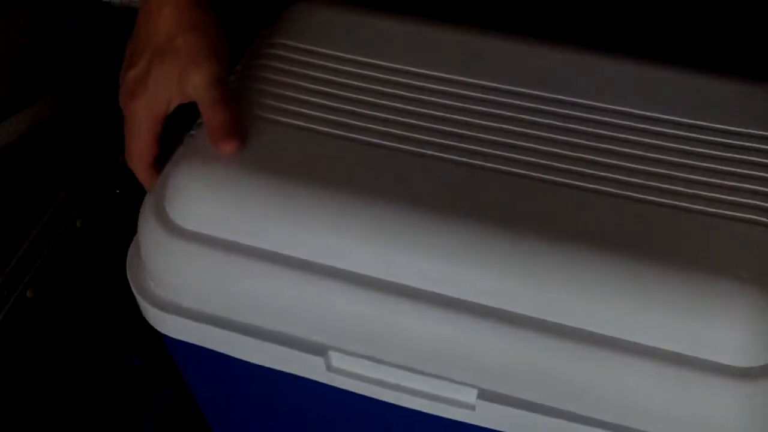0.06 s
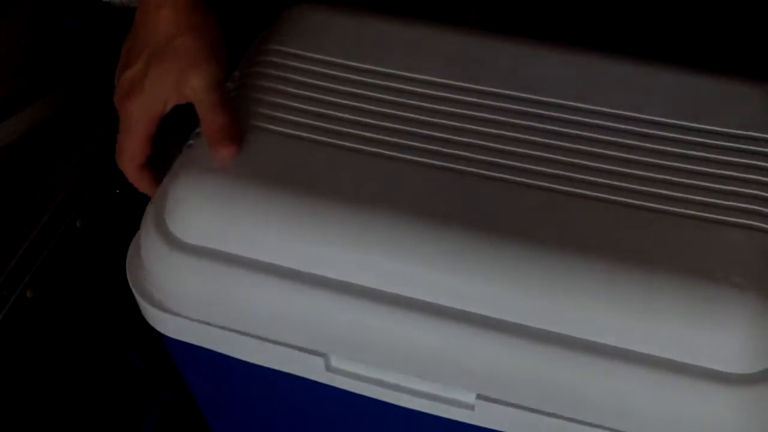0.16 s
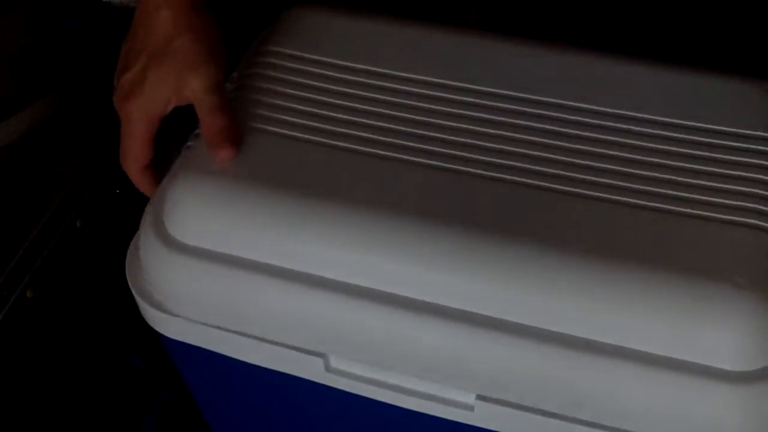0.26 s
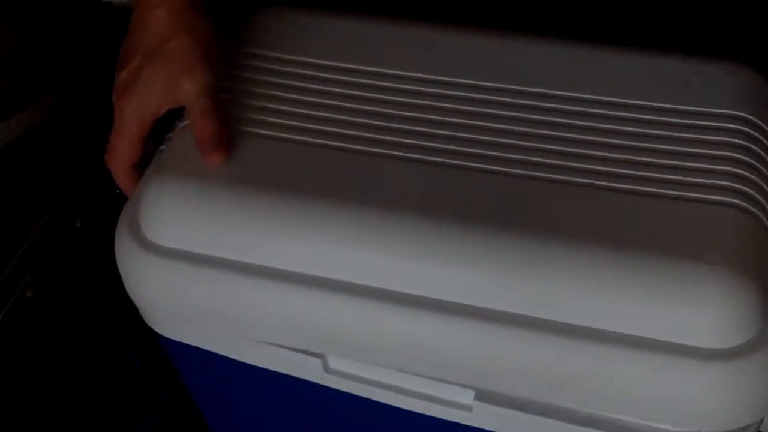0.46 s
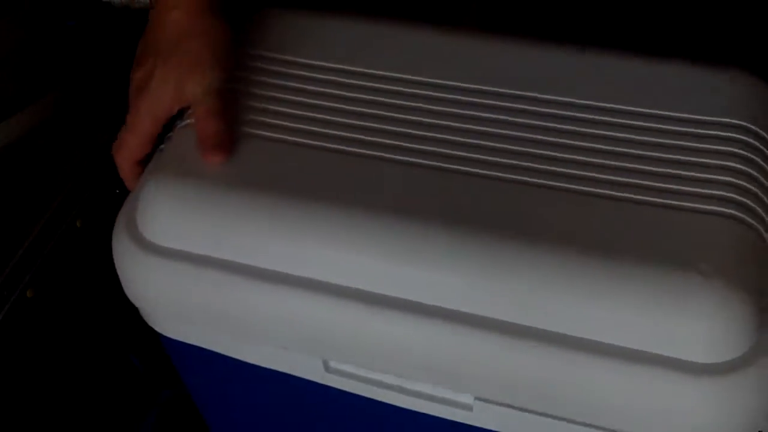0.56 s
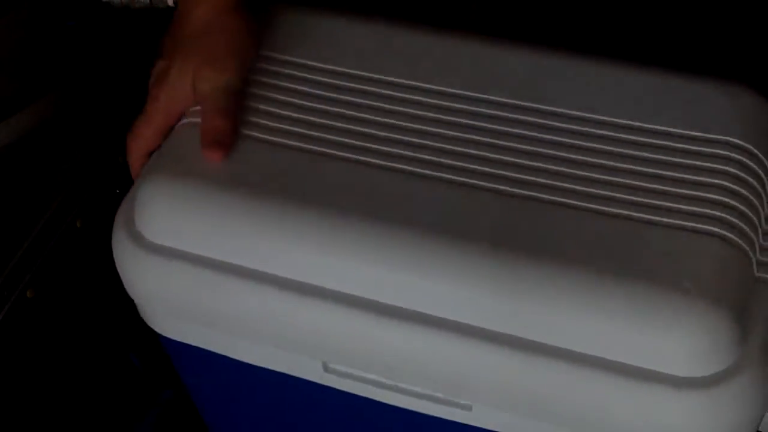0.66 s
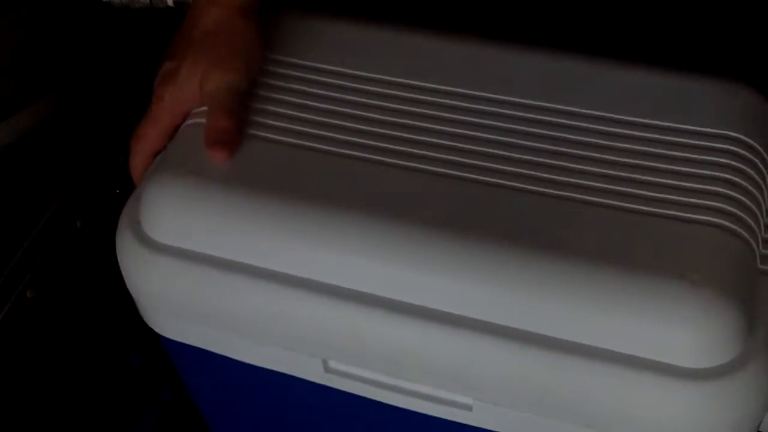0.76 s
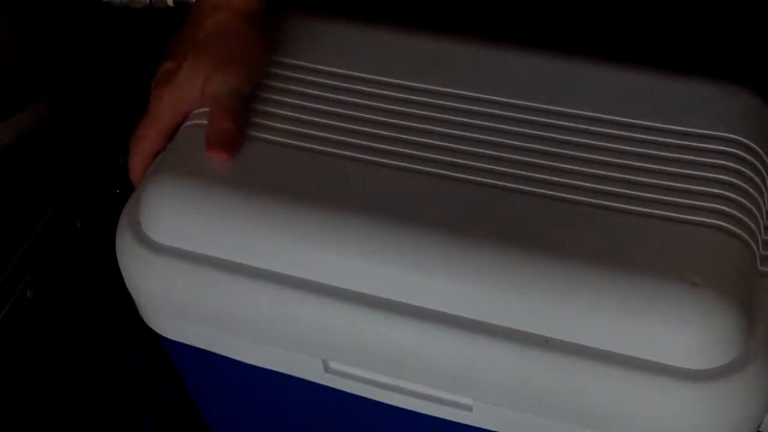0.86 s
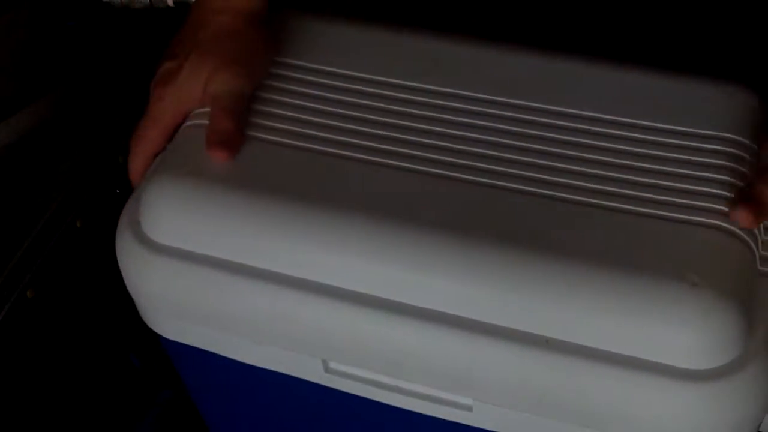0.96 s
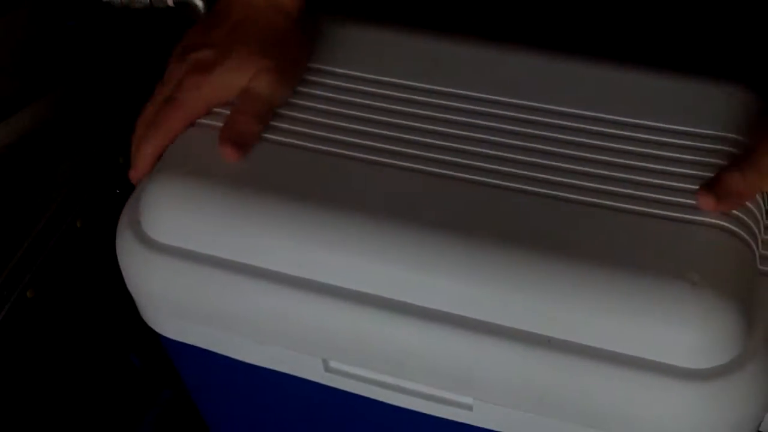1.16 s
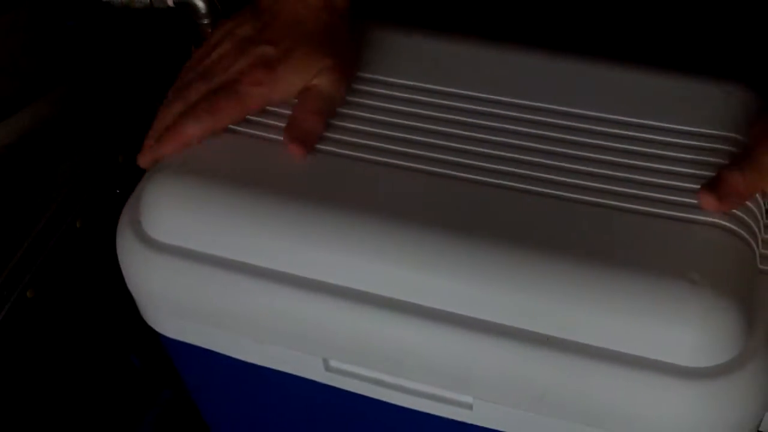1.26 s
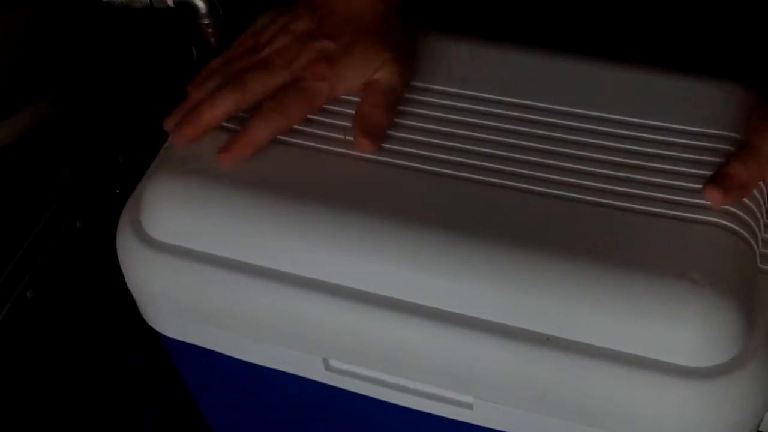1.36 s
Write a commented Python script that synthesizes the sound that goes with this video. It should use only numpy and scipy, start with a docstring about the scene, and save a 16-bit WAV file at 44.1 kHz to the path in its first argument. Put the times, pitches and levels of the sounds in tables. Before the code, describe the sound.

A cooler lid is pressed closed: two hard plastic knocks, small rattles, and a hand brushing over it

```python
"""A quiet room, close up: a hand presses the hollow plastic lid of a cooler shut.
Knocks ring the hollow and the stiff walls as dying sines, with spiky noise for the cracks.
The seal squeaks once as a wavering tone with overtones; the palm then slides as shaped noise.
Under it lie the murmur of the lid on the rim, floor rumble, reflections, air and a thin tone."""
import sys
import numpy as np
from scipy import signal
from scipy.fft import rfft, irfft
from scipy.io import wavfile
from scipy.ndimage import uniform_filter1d

SR = 44100
rng = np.random.default_rng(int(sys.argv[2]) if len(sys.argv) > 2 else 0)


def gain_from_db(level_db):
    """Convert decibel levels to linear amplitude factors (20 dB per decade)."""
    decades = np.asarray(level_db, float) / 20
    return 10 ** decades


def put_to_file(sound):
    """Save the sound as 16-bit audio at rate SR, in the file named by the first command-line argument."""
    columns = np.atleast_2d(sound).T  # one column per channel
    safe = np.clip(columns, -1, 1)
    whole_steps = np.round(safe * 32767)
    wavfile.write(sys.argv[1], SR, whole_steps.astype(np.int16))


N = 61739

# Colour of room air and microphone hiss: f/Hz, relative level per Hz/dB
AIR_COLOUR = [(20, -2.5), (60, -18), (120, -0.5), (250, -13), (600, -9.5), (1200, -13), (2600, -18.5),
              (4500, -20.5), (6500, -18.5), (8000, -23.5), (10000, -25), (12000, -34.5), (14000, -27),
              (16000, -20)]
# Colour of the hiss that differs between the channels: f/Hz, relative level per Hz/dB
SIDE_COLOUR = [(59, -49), (100, -11), (244, -7.5), (2130, -12.5), (2470, -12), (5420, -10.5), (7290, -16),
               (7940, -10.5), (16000, -8)]
# Box rocking on the floor: t/s, level/dB
RUMBLE_LEVEL = [(0, -48), (.19, -54), (.21, -41), (.26, -68), (.34, -51), (.38, -49.5), (.44, -40),
                (.47, -29), (.53, -41), (.59, -37), (.67, -72), (.69, -47), (.75, -44), (.83, -37.5),
                (.88, -47), (.98, -46), (1.05, -48), (1.23, -51.5), (1.36, -45.5), (1.4, -67)]
# Colour of that rocking: f/Hz, relative level per Hz/dB
RUMBLE_COLOUR = [(15, -2), (32, 7.7), (70, 5), (95, -0.5), (150, -16), (250, -58)]
# Dying away of the room: f/Hz, t60/s
ROOM_DECAY = [(150, 0.24), (500, 0.17), (1500, 0.15), (3000, 0.24), (6000, 0.26), (10000, 0.11),
              (16000, 0.16)]
# Colour of the reflections: f/Hz, relative level/dB
ROOM_COLOUR = [(100, -49), (300, -23), (1000, -26.5), (3000, -31), (6000, -32), (10000, -30.5),
               (16000, -65)]
# Lid working against the rim: t/s, level/dB
SHUDDER_LEVEL = [(0, -69), (.06, -49.5), (.16, -44.5), (.26, -41), (.33, -52.5), (.36, -31.5), (.40, -29),
                 (.455, -34), (.5, -40), (.6, -43), (.65, -40.5), (.675, -34.5), (.74, -38), (.8, -40),
                 (.87, -52), (1.4, -71)]
# Hollow of the lid and box: f/Hz, relative level/dB, t60/s
HOLLOW_MODES = [(72, -1, .09), (105, -6, .05), (140, -1, .07), (168, 0, .075), (198, 0, .065),
                (228, 0, .075), (258, 0, .1), (295, -3, .06)]
# Stiff walls: f/Hz, relative level/dB, t60/s
WALL_MODES = [(417, -4.5, 0.082), (567, -9, 0.09), (669, -17, 0.034), (856, 0, 0.032), (941, 11.5, 0.016),
              (1049, 1, 0.026), (1360, 0, 0.0083), (1570, -5, 0.033), (1782, -8.5, 0.075), (2580, -1, .015),
              (4440, 5.5, 0.004), (5000, -33, 0.0086)]
# Short shifts of the fingers: centre t/s, half length t/s, level/dB
SCUFFS = [(-0.01, 0.035, -58), (0.181, .012, -49), (0.397, 0.046, -48), (0.443, 0.014, -46.5),
          (0.64, 0.09, -49), (0.801, 0.058, -44.5), (0.927, 0.035, -43), (1.014, 0.02, -44)]
# Colour of the scuffs: f/Hz, relative level per Hz/dB
SCUFF_COLOUR = [(1470, -61), (2500, -26), (2790, -16), (5150, -13.5), (6500, 1.5), (7420, -6), (13800, -18),
                (16000, -34)]
# Palm speed, heard as level: t/s, level/dB
SLIDE_LEVEL = [(1.08, -55), (1.14, -46.5), (1.168, -40), (1.334, -31), (1.39, -33.5), (1.4, -34)]
# Colour of the stroke as it starts and as it ends: f/Hz, relative level per Hz/dB
SLIDE_EARLY = [(710, -56), (1200, -36), (1590, -37), (1870, -19), (2270, -9), (2620, -11), (3110, -10),
               (6440, 2), (14500, -17), (16000, -17)]
SLIDE_LATE = [(590, -18.5), (1000, -22), (1520, -16.5), (1710, -8), (2440, -14), (3580, -14), (4470, -7.5),
              (5630, -14.5), (6780, -0.5), (8160, -11), (13300, -24), (16000, -23)]
# Swell and fade of the seal's squeak: t/s, level/dB
SQUEAK_LEVEL = [(.468, -62), (.482, -40), (.5, -43), (.514, -52), (.526, -45), (.56, -52), (.6, -62),
                (.63, -70)]
# Overtones of the squeak: multiple of the pitch, relative level/dB
SQUEAK_ORDERS = [(1, 0), (2, 0), (3, -3), (4, -4), (5, -8), (6, -12), (7, -11), (8, -15), (9, -17),
                 (10, -21)]
# Blows of lid on rim: t/s, thump level/dB, struck place (octaves above 200 Hz that ring most),
# clack level/dB, crack level/dB
KNOCKS = [(.0130, -18, 0.19, -22.5, -28.5), (0.0305, -34, -0.71, -59, -28), (0.052, -54, -0.16, -45, -60),
          (0.1224, -26.5, -0.028, -53, -65), (0.197, -54, -1.4, -57, -73), (0.2044, -2, -0.038, -6, -3),
          (0.208, -12, -0.34, -44, -32), (0.225, -41, -0.67, -51, -53), (0.2442, -20, -0.32, -29, -57),
          (.3000, -33, -0.13, -39, -60), (0.359, -37, 1, -53, -37), (.3700, -21, -0.34, -24.5, -27),
          (0.385, -14.5, 0.39, -26, -29), (0.3923, -17, -0.36, -42, -36), (0.4092, -20, 0.29, -34, -29),
          (0.4241, -46, 0.79, -38, -45), (0.4637, -11, 0.33, -8.5, -23), (0.4676, -10.5, 0.18, -25.5, -17),
          (0.48, -20.5, 0.483, -59, -54), (.4880, -18, -0.014, -33, -49), (0.495, -35, 0.77, -17, -42),
          (0.542, -42, -0.93, -58, -66), (.6830, -2.5, .03, -7.5, 4.5), (0.684, -23.5, 1, -18, -3.5),
          (0.703, -37, 1, -45, -32), (0.72, -3, -0.1, -42, -15.5), (0.731, -41, -.25, -49, -43),
          (0.75, -16.5, -0.46, -36, -44), (0.759, -26.5, -0.97, -58, -46), (0.7739, -11, -1.178, -37, -51),
          (.7800, -17, -0.48, -30, -25.5), (0.792, -26.5, -0.58, -51, -61),
          (0.806, -27.5, -0.054, -36, -60), (0.826, -31.5, -0.43, -55, -60), (.9800, -36, -0.79, -66, -74),
          (1.010, -63, -0.95, -29.5, -63)]
# Colour of the cracks: f/Hz, relative level per Hz/dB
CRACK_COLOUR = [(600, -30), (1300, -20), (1900, 2.5), (2500, 2), (3200, -2), (4500, 6.5), (5500, 6.5),
                (6900, 7.6), (7800, -4.5), (12000, -14.5), (16000, -30)]


def evened(x):
    """Scales to rms 1."""
    return x / np.sqrt(np.mean(x ** 2) + 1e-20)


def read(points, hz):
    """Reads a table on a log-frequency axis."""
    f, value = np.transpose(points)
    return np.interp(np.log(hz + 1), np.log(f + 1), value)


def level(curve):
    """Gain over time from a level table, all but silent outside its rows."""
    s, db = np.transpose(curve)
    return gain_from_db(np.interp(np.arange(N) / SR, s, db, left=-120, right=-120))


def add(mix, s, sound):
    """Mixes a sound in at time s."""
    part = mix[round(s * SR):][:len(sound)]
    part += sound[:len(part)]


def noise(colour, size=N):
    """Noise of rms 1 with the spectrum of the table."""
    hz = np.fft.rfftfreq(size, 1 / SR)
    spectrum = rfft(rng.standard_normal(size)) * gain_from_db(read(colour, hz))
    return evened(irfft(spectrum, size))


def wander(width, shape=N):
    """Smoothed random drift, a moving average over width samples."""
    return uniform_filter1d(rng.standard_normal(shape), size=width)


def ring(modes, extra_db, phases, t):
    """A struck body as a sum of dying sine modes, scaled to peak 1."""
    x = np.zeros(len(t))
    for (hz, db, t60), more_db, phase in zip(modes, extra_db, phases):
        x += gain_from_db(db + more_db - 60 * t / t60) * np.sin(2 * np.pi * hz * t + phase)
    x *= np.minimum(t / 0.00035, 1)  # no click at the start
    return x / abs(x).max()


def air():
    """Steady room air and hiss as shaped noise, with one faint thin tone."""
    air_db, whine_hz, whine_db = -48.5, 11989, -70
    whine = np.sin(2 * np.pi * whine_hz * np.arange(N) / SR)
    return gain_from_db(air_db) * noise(AIR_COLOUR) + gain_from_db(whine_db) * whine


def channel_difference(mono):
    """Hiss and a faint smeared copy of the sound, to be added left and subtracted right."""
    hiss_db, spill_db = -61, -48.5
    smear = rng.standard_normal(400) / 20
    spill = signal.oaconvolve(mono, smear)[:N]
    return gain_from_db(hiss_db) * noise(SIDE_COLOUR) + gain_from_db(spill_db) * spill


def rumble():
    """The box rocks on the floor: low noise that swells and sinks."""
    return level(RUMBLE_LEVEL) * noise(RUMBLE_COLOUR)


def room(x):
    """Dense reflections, each band dying at its own speed."""
    hz, t, z = signal.stft(rng.standard_normal(SR // 2), SR, nperseg=256)
    z = z * gain_from_db(-60 * t / read(ROOM_DECAY, hz)[:, None])
    z = z / np.sqrt((abs(z) ** 2).sum(1, keepdims=True))  # equal energy in every band
    z = z * gain_from_db(read(ROOM_COLOUR, hz))[:, None]
    tail = signal.istft(z, SR, nperseg=256)[1] / 11
    delay = np.zeros(150)  # samples before the reflections begin
    return signal.fftconvolve(x, np.r_[delay, tail])[:N]


def shudder():
    """Uneven pressure, as noise, keeps the hollow and the walls murmuring between blows."""
    t = np.arange(SR // 4) / SR
    hollow, walls = HOLLOW_MODES[1:], WALL_MODES[:4]
    extra_db = [0] * len(hollow) + [-8.] * len(walls)
    body = ring(hollow + walls, extra_db, np.zeros(len(extra_db)), t)
    murmur = signal.fftconvolve(rng.standard_normal(N), body)[:N]
    return level(SHUDDER_LEVEL) * evened(murmur)


def hand():
    """Skin on grained plastic: short scuffs, then a long stroke whose hiss deepens as it goes."""
    turn_start_s, turn_end_s, patchy_db = 1.266, 1.37, 0.5
    t = np.arange(N) / SR
    bumps = sum(gain_from_db(db) * np.exp(-((t - s) / half) ** 2) for s, half, db in SCUFFS)
    late = np.clip((t - turn_start_s) / (turn_end_s - turn_start_s), 0, 1)
    stroke = np.sqrt(1 - late) * noise(SLIDE_EARLY) + np.sqrt(late) * noise(SLIDE_LATE)
    grain = gain_from_db(patchy_db * evened(wander(200)))
    return (bumps * noise(SCUFF_COLOUR) + level(SLIDE_LEVEL) * stroke) * grain


def squeak():
    """Stick-slip of the seal: a wavering pitch whose overtones flutter each on their own."""
    pitch_hz, waver_share, flutter_db = 925, .016, 3.5
    waver, *flutters = (evened(v) for v in wander(260, (1 + len(SQUEAK_ORDERS), N)))
    turns = np.cumsum(pitch_hz * (1 + waver_share * waver)) / SR
    tone = np.zeros(N)
    for (k, db), flutter in zip(SQUEAK_ORDERS, flutters):
        tone += gain_from_db(db + flutter_db * flutter) * np.cos(2 * np.pi * k * turns + k * k)
    return level(SQUEAK_LEVEL) * tone


def knocks():
    """Each blow rings the hollow near the struck place, clacks the walls and cracks in spikes."""
    hard_rise_s, soft_rise_s, soft_below_db = 0.0006, 0.003, -31.5  # weak contacts start gently
    place_width_oct = .11  # modes this far from the struck place lose 6 dB
    hold_s, decay_s, spikes_db = .0017, .007, 3.5  # four rise times lengthen the crack's decay
    t, out = np.arange(SR // 4) / SR, np.zeros(N)
    octaves = np.log2(np.array(HOLLOW_MODES)[:, 0] / 200)
    # every blow excites the walls a little differently, in level and in phase
    chance = rng.standard_normal((len(KNOCKS), 2, len(WALL_MODES)))
    for (s, thump_db, place, clack_db, crack_db), (spread_db, turn) in zip(KNOCKS, chance):
        rise = hard_rise_s if crack_db > soft_below_db else soft_rise_s
        onset = np.minimum(t / rise, 1)
        place_db = -6 * ((octaves - place) / place_width_oct) ** 2
        thump = ring(HOLLOW_MODES, place_db, np.full(len(HOLLOW_MODES), .8), t)
        clack = ring(WALL_MODES, spread_db, 1 + .5 * turn, t)
        burst = gain_from_db(-60 * np.maximum(t - rise - hold_s, 0) / (decay_s + 4 * rise))
        spikes = gain_from_db(spikes_db * evened(wander(12, len(t))))
        crack = burst * spikes * noise(CRACK_COLOUR, len(t))
        crack /= abs(crack).max()
        sharp = gain_from_db(clack_db) * clack + gain_from_db(crack_db) * crack
        add(out, s, np.sqrt(onset) * gain_from_db(thump_db) * thump + onset * sharp)
    return out


def scene():
    """One microphone feeds both channels; only a faint hiss and smear differ."""
    lid = knocks() + squeak()
    mono = lid + room(lid) + shudder() + hand() + rumble() + air()
    return mono + channel_difference(mono) * np.array([[1], [-1]])


def roll_off(x):
    """The treble ends steeply here."""
    return signal.sosfilt(signal.butter(12, 16460, fs=SR, output="sos"), x)


def record(dry):
    """Peaks beyond 0.9 of full scale are cut flat, then the top of the treble is filtered off."""
    edge_hz = 15400
    clipped = np.clip(dry, -.9, .9)
    lowpass = signal.firwin(511, edge_hz, window=("kaiser", 9), fs=SR)
    finished = signal.oaconvolve(clipped, lowpass[None], "same")
    return roll_off(finished)


dry = scene()
out = record(dry)
put_to_file(out)
```